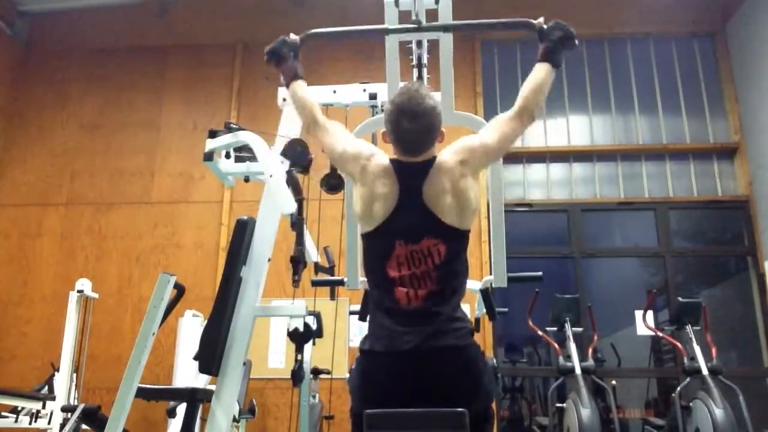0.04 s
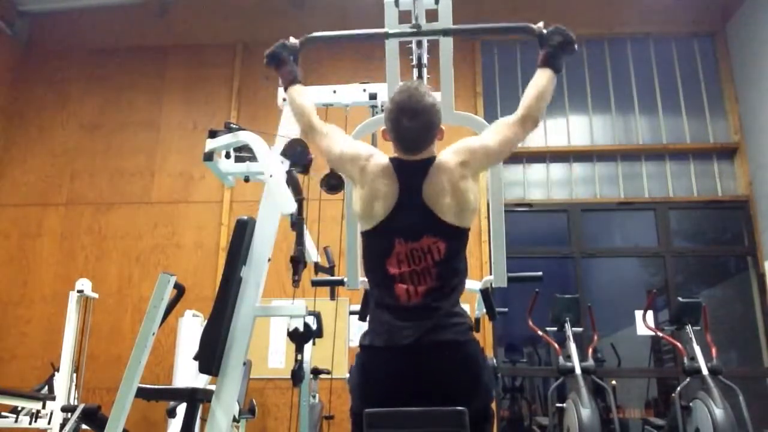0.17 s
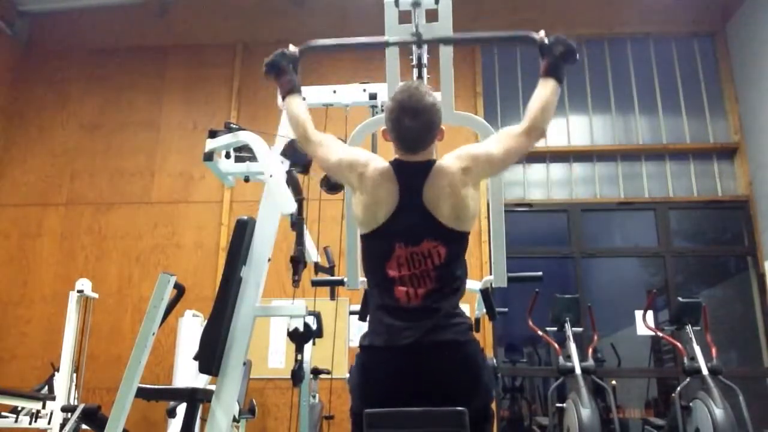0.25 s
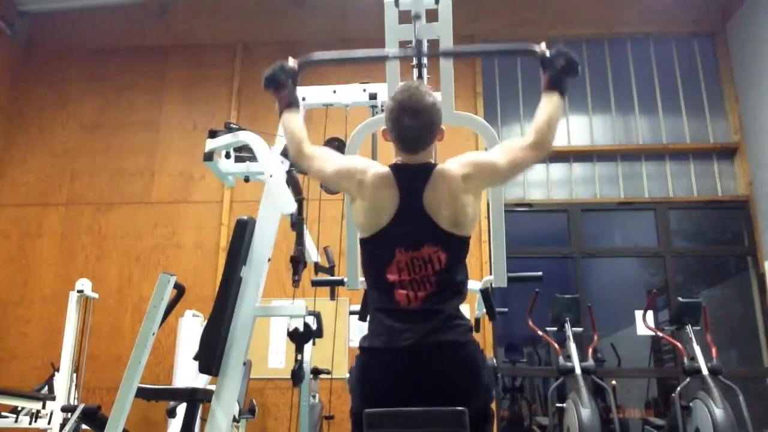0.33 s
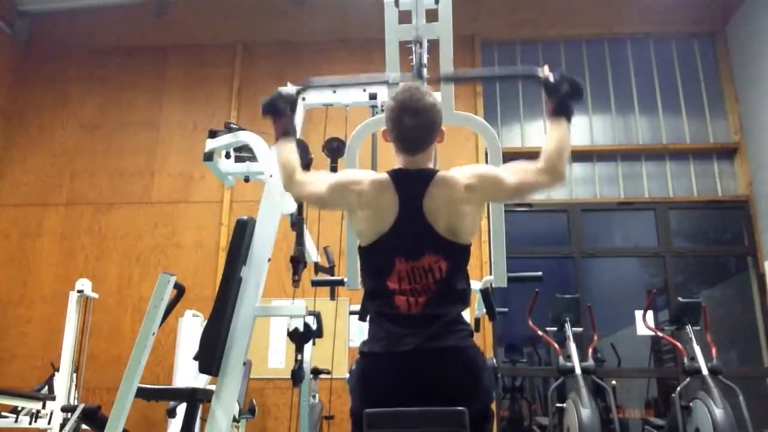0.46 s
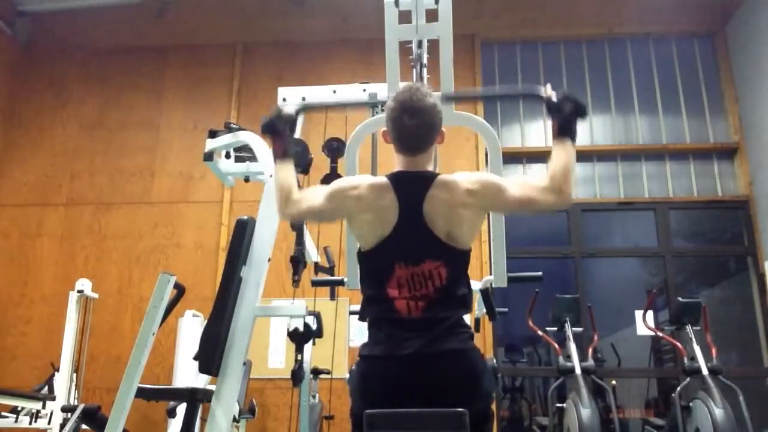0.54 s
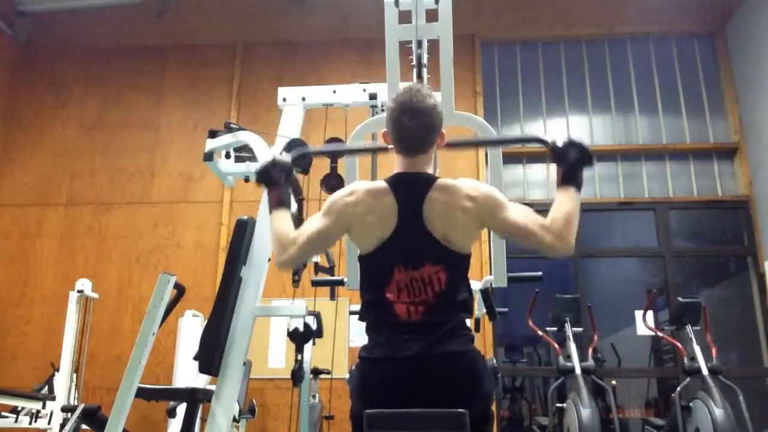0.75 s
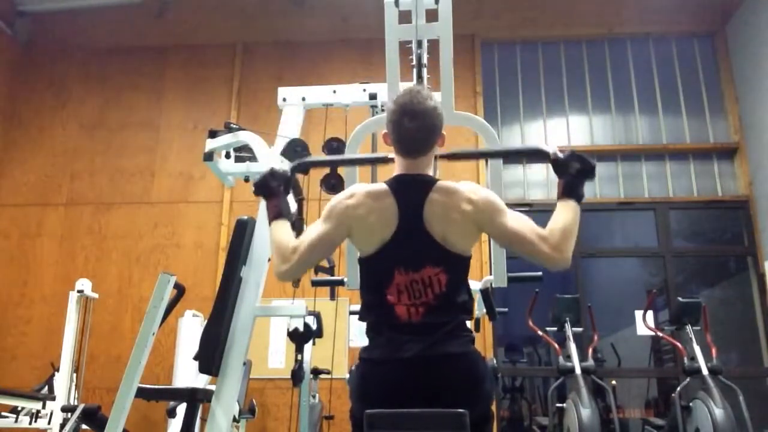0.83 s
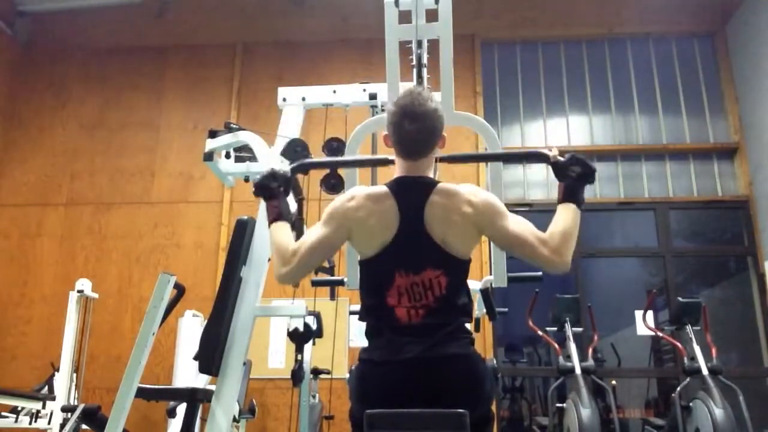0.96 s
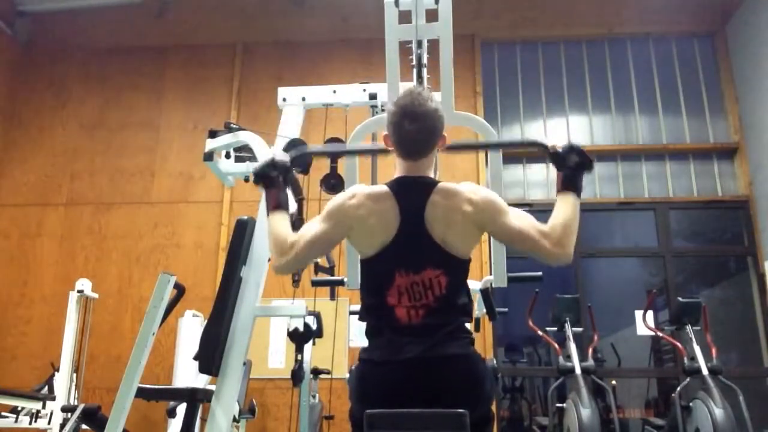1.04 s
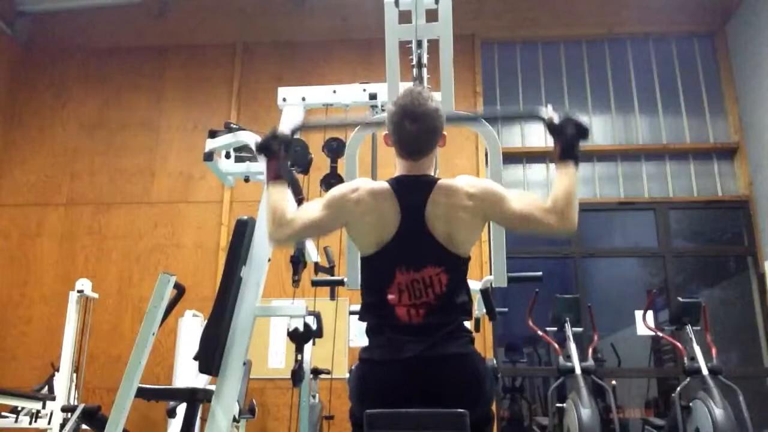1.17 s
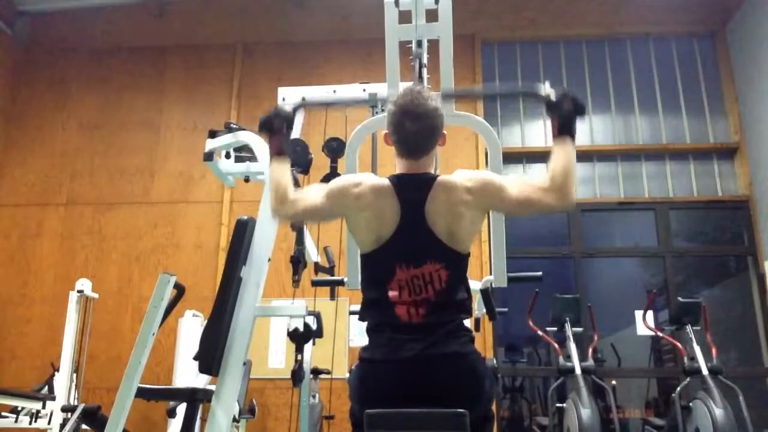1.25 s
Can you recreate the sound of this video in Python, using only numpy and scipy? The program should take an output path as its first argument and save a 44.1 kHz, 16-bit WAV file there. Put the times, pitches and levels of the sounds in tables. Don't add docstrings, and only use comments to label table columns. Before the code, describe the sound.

Two sharp metallic clacks of a weight stack, each ringing out into a hard-walled gym

```python
import sys
import numpy as np
from scipy import signal
from scipy.fft import rfft, irfft, next_fast_len
from scipy.io import wavfile

SR = 44100
rng = np.random.default_rng(int(sys.argv[2]) if len(sys.argv) > 2 else 0)


def linear_from_db(decibels):
    return 10 ** (np.asarray(decibels, float) / 20)


def to_wav(s):
    ch = np.atleast_2d(s).T
    pcm = np.round(np.clip(ch, -1, 1) * 32767)
    wavfile.write(sys.argv[1], SR, pcm.astype(np.int16))


N = 57330


def rms_one(x):
    return x / np.sqrt(np.mean(x ** 2) + 1e-20)


def at_hz(points, hz, column=1):
    points = np.array(points)
    return np.interp(np.log(hz), np.log(points[:, 0]), points[:, column])


def noise_bands():
    settle = 4000
    edges_hz = 22 * 2 ** np.arange(0, 9.6, 1 / 3)
    white = rng.standard_normal((2, N + settle))
    for k, (low, high) in enumerate(zip(edges_hz, edges_hz[1:])):
        sos = signal.butter(2, [low, high], "band", fs=SR, output="sos")
        yield np.sqrt(low * high), signal.sosfilt(sos, white[k % 2])[settle:]


def convolve(x, response):
    size = next_fast_len(2 * N)
    return irfft(rfft(x, size) * rfft(response, size), size)[:N]


# f/Hz, first knock/dB, second knock/dB, t60/s
MACHINE_MODES = [(160.9, -7, -17, 0.72), (204.1, -4.5, -8, 0.31), (260, -9.5, -2.5, 0.21), (341, 1, 3, 0.048),
                 (378.3, -7, -14.5, 0.32), (421.7, 1, -12, 0.092), (503.3, -1.5, -13, 0.2),
                 (748, 2, -22, 0.041), (883, -12.5, -3, 0.11), (957, 0, -1, 0.13), (1045.2, -4, -7, 0.41),
                 (1123, -6, -25, 0.35), (1241, -10, -15.5, 0.34), (1398, -18.5, -15, 0.48),
                 (1556, -4.5, -15, 0.11), (1682, -14, -8.5, 0.36), (1829, -18, -12, 0.28),
             (2320, -27, -54, 0.14), (2800, -5, -15, 0.1), (3070, -15, -15.5, 0.2), (3480, -41, -8.5, 0.11),
             (3760, -18, -20.5, 0.42), (5310, -29, -48, 0.079)]
MODES = MACHINE_MODES


def ringing(knock, t, strengths):
    out = 0
    for mode, strength in zip(MODES, strengths):
        hz, level_db, t60_s = mode[0], mode[1 + knock], mode[3]
        out = out + strength * np.sin(2 * np.pi * hz * t) * linear_from_db(level_db - 60 * t / t60_s)
    return out


# t/s, level/dB, rise/s
BLOWS = [
    (.2162, -29, 0.006),
    (.6225, -33, 0.0076),
]


def blows():
    out, t = np.zeros(2 * N), np.arange(N) / SR
    signs = (-1.) ** np.arange(len(MODES))
    for knock, (s, db, rise_s) in enumerate(BLOWS):
        i = int(s * SR)
        out[i:i + N] += linear_from_db(db) * (1 - np.exp(-t / rise_s)) * ringing(knock, t, signs)
    return out[:N]


# t/s, level/dB, f/Hz, t60/s
THUDS = [(.1920, -36, 467, 0.035), (.1975, -41.5, 630, 0.023), (.2160, -6, 630, 0.0077),
         (.2165, -17, 167, 0.039), (.2165, -20.5, 940, 0.018), (.6222, -12.5, 564, 0.0086),
         (.6290, -15.5, 332, 0.026), (.6230, -19.5, 207, 0.03), (.6230, -26, 940, 0.092),
         (.6440, -21.5, 260, 0.015), (0.75, -26.5, 333, 0.017)]


def thuds():
    rise_s = 0.00085
    out, t = np.zeros(2 * N), np.arange(N) / SR
    for s, db, hz, t60_s in THUDS:
        i = int(s * SR)
        swing = np.sin(2 * np.pi * hz * t) * (1 - np.exp(-t / rise_s))
        out[i:i + N] += linear_from_db(db - 60 * t / t60_s) * swing
    return out[:N]


def contact_force(cut_hz, t):
    pulse = t * np.exp(-2 * np.pi * cut_hz * t)
    return pulse / pulse.sum()


# t/s, level/dB, hardness as cut f/Hz, knock index
CONTACTS = [(0.1922, -31.5, 1540, 0), (0.2, -38, 1510, 0), (0.209, -34, 8900, 0), (0.213, -39.5, 9000, 0),
            (0.2162, -13.5, 2310, 0), (.218, -14.5, 1860, 0), (.2205, -32.5, 5050, 0),
            (.2225, -38, 2500, 0), (.2275, -28.5, 3980, 0), (0.231, -37, 3960, 0), (0.6186, -29.5, 8700, 1),
            (0.624, -30.5, 6000, 1), (0.6235, -25.5, 3760, 1), (0.628, -37.5, 5560, 1),
            (0.627, -57, 5800, 1), (0.6312, -18.5, 2340, 1), (0.635, -49, 2500, 1), (.2510, -37, 1200, 0),
            (.6590, -40, 1500, 1), (0.676, -29, 1500, 1), (.6950, -40, 3000, 1), (0.714, -42, 2500, 1)]
# f/Hz, density/dB per Hz
CRACK = [
    [(60, -60), (150, -22), (500, -8), (970, -1), (1820, -11), (3090, -1.5), (8130, -10.5), (9800, -4.5),
     (15400, -3)],
    [(60, -30), (150, -22), (600, 0.5), (970, 0.5), (2300, -9.5), (3090, 0.5), (5680, -10.5), (11400, -5.5),
     (15400, -8)],
]


def plate_contacts():
    ring_db, ring_luck_db = -26, 3.5
    crack_db, crack_t60_s, crack_rise_s = 3.0, 0.031, 0.00074
    out, t = np.zeros(N + SR), np.arange(SR // 2) / SR
    bands = list(noise_bands())
    sprays = [rms_one(sum(linear_from_db(at_hz(colour, hz)) * b for hz, b in bands)) for colour in CRACK]
    crack_shape = (1 - np.exp(-t / crack_rise_s)) * linear_from_db(crack_db - 60 * t / crack_t60_s)
    luck = rng.standard_normal((len(CONTACTS), len(MODES), 2))
    for (s, db, cut_hz, knock), row in zip(CONTACTS, luck):
        i, knock = int(s * SR), int(round(knock))
        strengths = np.sign(row[:, 0]) * linear_from_db(ring_luck_db * row[:, 1])
        ring = linear_from_db(ring_db) * ringing(knock, t, strengths)
        crack = sprays[knock][i:i + len(t)] * crack_shape
        force = contact_force(cut_hz, t[:400])
        out[i:i + len(t)] += linear_from_db(db) * signal.fftconvolve(ring + crack, force)[:len(t)]
    return out[:N]


# f/Hz, early t60/s, late t60/s
HALL_T60 = [(100, .9, 1.6), (300, .8, 1.5), (700, .6, 1.2), (1500, .7, 1.6), (4000, .6, 1.7),
            (8000, .5, .75), (14000, .48, .55)]


def reflections(colour):
    build_s, late_db = 0.02, -6.5
    dip_s, dip_spread_s, dip_db = 0.0565, 0.0075, -2.5
    lumps_per_s, lump_db, lumps_fade_s = 60, 2.5, 0.15
    t = np.arange(N) / SR
    build = 1 - np.exp(-t / build_s)
    dip = linear_from_db(dip_db * np.exp(-((t - dip_s) / dip_spread_s) ** 2))
    knots_s = np.arange(0, 2, 1 / lumps_per_s)
    wander = np.interp(t, knots_s, rng.standard_normal(len(knots_s)))
    lumps = linear_from_db(lump_db * np.exp(-t / lumps_fade_s) * wander)
    start, dying = np.zeros(N), np.zeros(N)
    for hz, b in noise_bands():
        band = linear_from_db(at_hz(colour, hz)) * b
        early_power = linear_from_db(-120 * t / at_hz(HALL_T60, hz))
        late_power = linear_from_db(2 * late_db - 120 * t / at_hz(HALL_T60, hz, column=2))
        start += band
        dying += band * np.sqrt(early_power + late_power)
    return build * dip * lumps * dying / np.std(start)


# t/s, broad level/dB, ringing level/dB
HALL_KNOCKS = [
    (.217, -30.5, -35),
    (.625, -32.5, -38.5),
]
# f/Hz, density/dB per Hz
HALL_COLOUR = [
    [(60, -46), (200, 3.5), (543, -7.5), (680, -5), (969, -3.5), (3890, -17), (9000, -31.5), (15400, -28.5)],
    [(60, -7), (250, 1.5), (700, -9), (1060, -4), (3500, -13), (7620, -21.5), (12000, -28.5), (15400, -29)],
]


def hall():
    air_cut_hz = 13000
    out, t = np.zeros(2 * N), np.arange(N) / SR
    for knock, (s, broad_db, ring_db) in enumerate(HALL_KNOCKS):
        ring = ringing(knock, t, np.ones(len(MODES)))
        ring = ring / np.sqrt(np.sum(ring ** 2))
        smeared = convolve(ring, reflections([(20, 0), (900, 0), (20000, -1)]))
        crash = reflections(HALL_COLOUR[knock])
        i = int(s * SR)
        out[i:i + N] += linear_from_db(broad_db) * crash + linear_from_db(ring_db) * smeared
    return signal.sosfilt(signal.butter(6, air_cut_hz, fs=SR, output="sos"), out[:N])


# f/Hz, density/dB per Hz
FLOOR = [(25, -3), (50, -1), (96, 1), (200, -8), (400, -14), (736, -21), (1400, -13), (2100, -19),
         (4000, -24), (7400, -31), (10000, -41), (15400, -44)]


def ventilation():
    floor_db, patchy_db = -57, -2
    knots = np.arange(0, N + 4000, 4000)
    floor = np.zeros(N)
    for hz, b in noise_bands():
        wander = np.interp(np.arange(N), knots, rng.standard_normal(len(knots)))
        floor += b * linear_from_db(at_hz(FLOOR, hz) + patchy_db * wander)
    return linear_from_db(floor_db) * rms_one(floor)


def scene():
    return (blows() + thuds() + plate_contacts() + hall() + ventilation())[None]


def band_limit(x):
    return signal.sosfilt(signal.butter(12, 15430, fs=SR, output="sos"), x)


def record(dry):
    low_hz, top_hz = 59.3, 15520
    x = signal.sosfilt(signal.butter(3, low_hz, "high", fs=SR, output="sos"), dry)
    x = signal.sosfilt(signal.cheby2(20, 50, top_hz, fs=SR, output="sos"), x)
    return band_limit(x)


dry = scene()
out = record(dry)
to_wav(out)
```